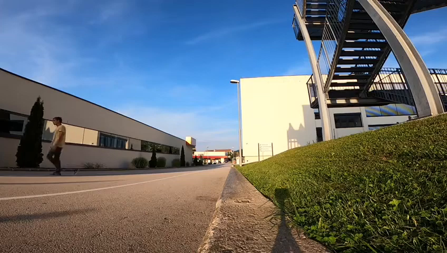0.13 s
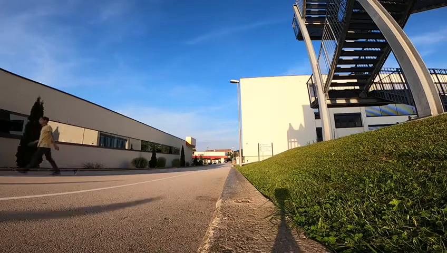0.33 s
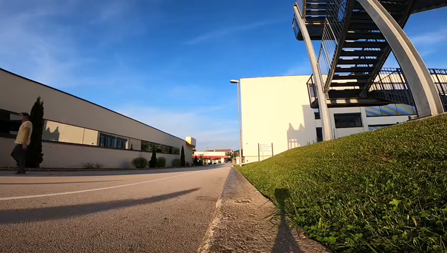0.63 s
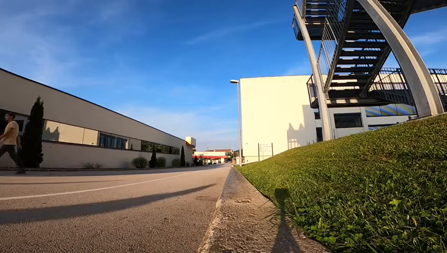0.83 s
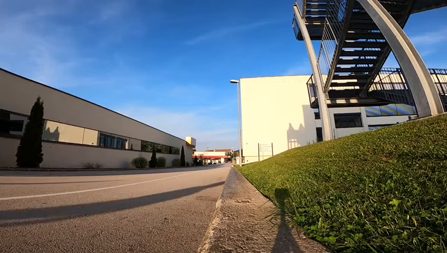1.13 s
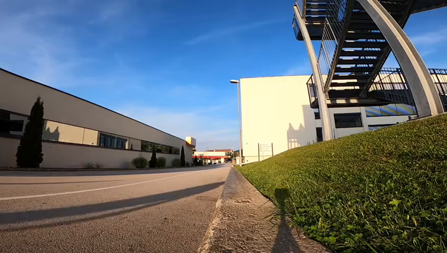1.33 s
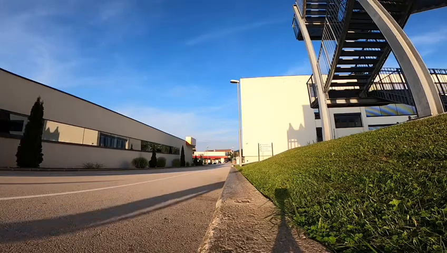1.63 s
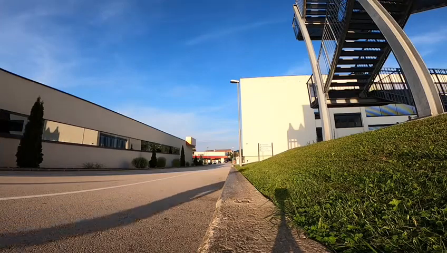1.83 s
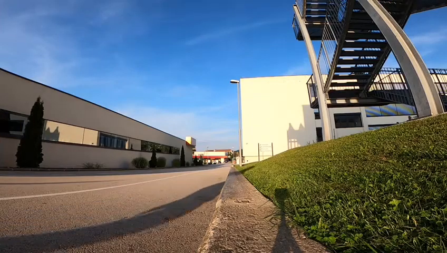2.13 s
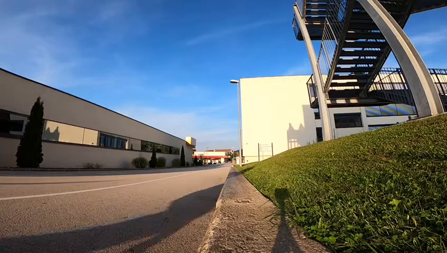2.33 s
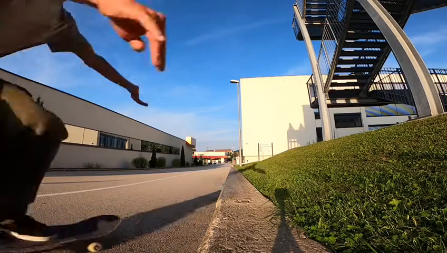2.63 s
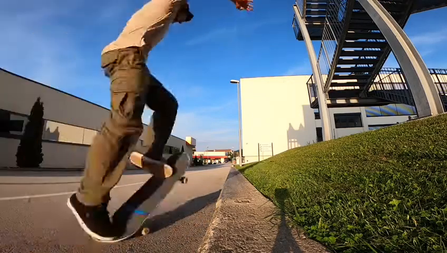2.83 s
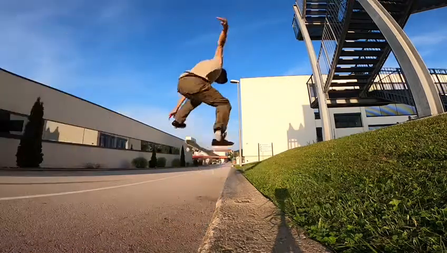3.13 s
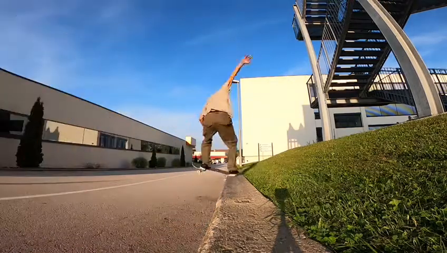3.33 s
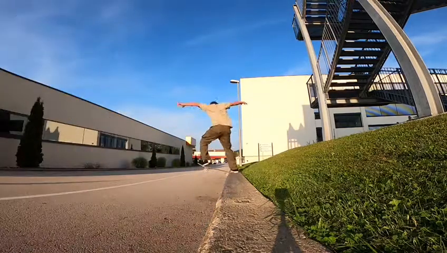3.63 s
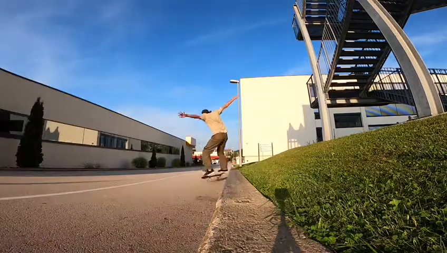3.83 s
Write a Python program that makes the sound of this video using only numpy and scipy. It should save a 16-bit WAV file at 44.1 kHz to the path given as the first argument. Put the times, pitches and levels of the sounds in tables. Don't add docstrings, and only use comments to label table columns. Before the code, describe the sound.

Outdoors by a building, skateboard wheels rumble and tick over grit, swelling past a low stereo microphone; a sharp pop, brief airborne whirr, bright landing clacks and a short fading grind follow over ventilation hum.

```python
import sys
import numpy as np
from scipy import signal
from scipy.fft import rfft, irfft
from scipy.io import wavfile
from scipy.ndimage import uniform_filter1d

SR = 44100
rng = np.random.default_rng(int(sys.argv[2]) if len(sys.argv) > 2 else 0)


def wrap_up_sound(samples):
    columns = np.atleast_2d(samples).T
    tamed = np.clip(columns, -1, 1)
    steps = np.round(tamed * 32767).astype(np.int16)
    wavfile.write(sys.argv[1], SR, steps)


def level_to_linear(level):
    exponent = np.asarray(level, float) / 20
    return 10 ** exponent


N = 176400
T = np.arange(N) / SR

# frequency in Hz, level in dB per Hz.
TOWN_SPECTRUM = [(20, 2), (53, 5.5), (150, -12), (860, -18.5), (2400, -27.5), (6500, -32.5), (11500, -78)]
TOWN_DB = -51.5

# time in seconds, level in dB.
HUM_LEVEL = [(.15, -32.5), (.3, -26), (.76, -31), (.87, -41.5), (1.0, -33), (1.4, -39), (2.1, -29),
             (2.3, -32.5), (2.42, -28), (2.85, -30.5), (3.09, -52), (3.25, -37.5), (3.62, -46.5),
             (3.85, -41.5)]
# time in seconds, level in dB.
UNDER_LEVEL = [(.15, -45), (.4, -40), (1., -42), (1.3, -39), (1.8, -35), (2.1, -45), (2.7, -49), (3.3, -45),
               (3.6, -51), (4., -49)]
HUM_HZ, HUM_SAG_HZ_PER_S, UNDER_WIDTH_HZ = 117.55, 0.923, 2.5

# time in seconds, level in dB, closeness from 0 to 1.
ROLL = [(.14, -41.5, 0.13), (.22, -34.5, 0.75), (.38, -39, 0.22), (.61, -34.5, 0.47), (.85, -37.5, 0),
        (1.2, -31.5, 0.06), (1.65, -31.5, 0.11), (2.12, -29.5, 0.06), (2.23, -24.5, 0.28),
        (2.34, -30.5, 0.48), (2.47, -25.5, 0.28), (2.62, -25, 0.82), (2.78, -20.5, 0.85), (2.91, -22, 0.95),
        (2.955, -27.5, 0.6), (3.0, -19, 1), (3.03, -35, 1)]
# time in seconds, extra level in dB.
JOINTS = [
    (.7, -1),
    (1.127, 2),
    (1.21, 4),
    (1.348, 3),
    (1.428, 3.5),
    (1.48, 3.5),
    (2.669, -0.5),
    (2.747, -2),
]
# frequency in Hz, level in dB per Hz.
FAR = [(90, -20.5), (150, 1.5), (1050, -12), (1250, -24), (5000, -36), (6800, -47.5), (9500, -47.5),
       (11600, -59)]
NEAR = [(70, -8.5), (140, -3), (300, 0.5), (480, -2), (900, -11), (2400, -20), (6500, -33.5),
        (11500, -46.5)]
# frequency in Hz, width in Hz, level in dB.
DECK = [(327, 89, 4), (482, 15, -2), (661, 54, 8), (990, 140, -10.5), (3370, 260, -12)]
STONES_PER_S, STONE_SPREAD_DB, JUDDER_DB, PATCH_S = 3500, 2, 0.52, .012
PASSES_S, SWING_S = 2.756, 0.083

# start in seconds, level in dB, pitch in Hz, t60 in seconds.
PEBBLES = [(.499, -19, 326, 0.038), (.584, -22, 346, .05), (.693, -25, 665, .04), (1.011, -20, 202, 0.037),
           (1.123, -15.5, 674, 0.066), (1.196, -21, 315, .045), (1.277, -18.5, 676, 0.045),
           (1.323, -20, 490, .043), (1.404, -24, 226, .04), (1.479, -12.5, 300, .02),
           (1.553, -17, 660, 0.04), (1.662, -28, 640, .05), (2.014, -22, 640, .04), (2.399, -14, 140, .06),
           (2.427, -10, 152, .06), (2.456, -19, 153, .05), (2.483, -11, 170, .05), (2.513, -13, 189.9, .04),
           (2.549, -14, 229, 0.059), (2.592, -5.5, 221, 0.046), (2.641, -10, 480, 0.054),
           (2.671, -6, 203, 0.051), (2.743, -9.5, 332, 0.028), (2.766, -10, 340, .04),
           (2.782, -11, 477, .03), (2.844, -16, 452, 0.052), (2.878, -13, 469, .04)]
# time in seconds, pitch in Hz, level in dB.
BOOM = [
    (2.199, 121.9, -58),
    (2.381, 141.7, -24),
    (2.52, 160.4, -26),
    (2.68, 200.5, -22),
    (2.85, 209.2, -30),
    (2.93, 264, -32),
    (2.999, 270.5, -48),
]

# centre in seconds, length in seconds, level in dB, lowest frequency in Hz.
SCUFFS = [
    (2.205, 0.022, -34, 900),
    (2.919, 0.094, -27.5, 708),
    (3.068, 0.059, -41.5, 2300),
    (3.092, 0.038, -39.5, 3820),
    (3.564, 0.032, -29, 800),
]
# frequency in Hz, level in dB per Hz.
SCUFF_SPECTRUM = [(500, -35), (1000, 20.5), (2600, 11.5), (7300, -2.5), (11500, -12.5)]

# start in seconds, level in dB, chatter length in seconds,
# brightness in dB per octave.
BLOWS = [(2.972, -27.5, 0.014, 3), (2.985, -22, 0.0049, -1), (3.0015, -10.5, 0.0068, -2.5),
         (3.014, -23.5, 0.004, -3), (3.3339, -15.5, 0.0032, -6.5), (3.3368, -14, 0.005, -4.5),
         (3.3942, -5.5, 0.0047, 1.5), (3.4148, -19, 0.002, -3), (3.4257, -12, 0.0073, 0.5),
         (3.441, -39, 0.0052, 9), (3.456, -25, .005, -4), (3.4615, -18, 0.0018, 6),
         (3.4727, -17, 0.00099, 4), (3.486, -34, 0.0056, -12), (3.511, -39, 0.0051, -4),
         (3.5545, -33, 0.0094, 2), (3.628, -38, 0.0091, -4), (3.663, -33.5, 0.015, 1),
         (3.762, -37.5, 0.02, 3)]
# frequency in Hz, level in dB per Hz.
CLACK_SPECTRUM = [(400, -24), (1200, -10), (2000, 0), (4400, -2), (5400, -13), (6800, -20), (7600, -42),
                  (11500, -56)]
# frequency in Hz, level in dB, t60 in seconds.
AXLE = [(1380, -3, .03), (1860, 0, .028), (2300, -2, .022), (2950, -3, .012), (3500, -2, .012),
        (4200, -2, .01)]
# start in seconds, level in dB, pitch in Hz, t60 in seconds.
KNOCKS = [(2.9725, -17, 840, 0.032), (2.979, -15, 423, .03), (2.9905, -15, 710, 0.011),
          (2.9945, -5, 360, 0.011), (3.0115, -10, 315, 0.024), (3.0265, -13, 198, .02),
          (3.3338, -17, 760, 0.0069), (3.3425, -16, 194, 0.041), (3.3985, -8.5, 266, 0.059),
          (3.4153, -5, 366, 0.012), (3.419, -15.5, 149, 0.094), (3.4335, -11, 240, 0.046),
          (3.447, -23, 536, 0.089), (3.461, -18.5, 209, 0.098), (3.474, -18, 1360, 0.029),
          (3.487, -20.5, 229, 0.078), (3.5, -23, 288, 0.1), (3.77, -30.5, 700, .05),
          (3.5555, -24.5, 1017, 0.1), (3.565, -26, 104, 0.27), (3.57, -27.5, 483, 0.12)]
WALL_S, WALL_DB, YARD_T60_S, YARD_DB = 0.029, -37, 0.68, -21.5

# time in seconds, level in dB.
SLIDE = [(3.015, -47), (3.05, -47), (3.13, -48.5), (3.22, -46.5), (3.31, -51.5), (3.36, -39), (3.45, -33.5),
         (3.5, -38), (3.54, -41), (3.631, -40), (3.7, -45.5), (3.76, -45), (3.85, -47.5), (4., -52)]
# frequency in Hz, level in dB per Hz.
GRIND = [(90, -26), (200, -2), (1100, -6), (3600, -12.5), (6700, -24.5), (7400, -36), (11500, -41)]

# time in seconds, level in dB.
SPIN = [
    (3.03, -56),
    (3.12, -51),
    (3.2, -42),
    (3.29, -47.5),
    (3.33, -37.5),
    (3.4, -53),
    (3.6, -60),
]
# frequency in Hz, width in Hz, level in dB.
BEARINGS = [(1010, 190, -1.5), (1700, 440, 0), (2450, 400, -5), (3440, 250, -6), (4970, 1100, -13),
            (6500, 350, -22)]

# frequency in Hz, difference in dB.
PORT_DB = [(100, 0.41), (350, 3.8), (620, 15), (1120, 27), (3600, 13.2), (6500, 3), (11600, 10.7)]
# frequency in Hz, phase in radians.
PORT_RAD = [(1000, 0.09), (3000, -4.5), (3600, -14), (6800, 4), (11500, 4)]
START_S, FADE_S, TOP_HZ = .12, 0.041, 11500

OPPOSITE = np.array([[1], [-1]])


def unit(x):
    return x / np.sqrt(np.mean(x ** 2))


def butter(x, order, hz, kind="low"):
    return signal.sosfilt(signal.butter(order, hz, kind, fs=SR, output="sos"), x)


def read(table, hz):
    a = np.array(table, float)
    return np.interp(np.log(np.maximum(hz, 1)), np.log(np.maximum(a[:, 0], 1)), a[:, 1])


def colour(x, table, tilt_db=0.):
    hz = np.arange(2049) * SR / 4096
    db = read(table, hz) + tilt_db * np.log2(np.maximum(hz, 50) / 2500)
    cepstrum = irfft(db * np.log(10) / 20)
    cepstrum[1:2048] *= 2
    cepstrum[2049:] = 0
    impulse = irfft(np.exp(rfft(cepstrum)))[:2048]
    return signal.fftconvolve(x, impulse)[:len(x)]


def ring(x, modes):
    out = 0
    for hz, db, t60 in modes:
        pole = np.exp(2j * np.pi * hz / SR - np.log(1000) / (t60 * SR))
        out = out + level_to_linear(db) * signal.lfilter([1], [1, -pole], x).imag
    return out


def t60_of(width_hz):
    return np.log(1000) / (np.pi * width_hz)


def resonances(table):
    return [(hz, db + 10 * np.log10(width), t60_of(width)) for hz, width, db in table]


def walk(rate):
    k = int(SR / rate)
    steps = np.repeat(rng.standard_normal(N // k + 1), k)
    return unit(uniform_filter1d(uniform_filter1d(steps, k), k)[:N])


def stones(per_s, spread_db):
    hit = rng.random(N) < per_s / SR
    size = np.minimum(rng.exponential(size=N), 4.5)
    return unit(hit * np.sign(rng.standard_normal(N)) * level_to_linear(spread_db * size))


def ports(x, left):
    hz = np.arange(N // 2 + 1) * SR / N
    right = level_to_linear(-read(PORT_DB, hz)) * np.exp(-1j * read(PORT_RAD, hz))
    side = np.clip(left, 0, 1.2) * irfft(rfft(x) * (1 - right) / (0.97 + right), N)
    return np.array([x + side, x - side])


def town():
    mid, side = (unit(colour(rng.standard_normal(N), TOWN_SPECTRUM)) for _ in range(2))
    side = butter(side, 1, 1500., "high")
    rumble = unit(butter(rng.standard_normal(N), 2, [30., 80.], "band"))
    mid = mid + level_to_linear(-6.0 + 2 * walk(5.6)) * rumble
    side = side + 0.63 * butter(unit(colour(rng.standard_normal(N), TOWN_SPECTRUM)), 2, 45.)
    return (mid + 0.87 * side * OPPOSITE) * level_to_linear(TOWN_DB + 2.2 * (3.5 - T) + 5.2 * walk(3.06))


def hum():
    s, db = np.array(HUM_LEVEL).T
    phase = 2 * np.pi * np.cumsum(HUM_HZ - HUM_SAG_HZ_PER_S * T + 1.203 * walk(8)) / SR
    under = unit(ring(rng.standard_normal(N), [(60.8, 0, t60_of(UNDER_WIDTH_HZ))]))
    rough = unit(butter(rng.standard_normal(N), 2, [106., 128.], "band"))
    tone = (1.43 * np.sin(phase) + 0.43 * rough) * level_to_linear(np.interp(T, s, db) + 2 * walk(20))
    return tone + level_to_linear(np.interp(T, *np.array(UNDER_LEVEL).T) - 2.5) * under


def roll():
    s, db, close = np.array(ROLL).T
    db = np.interp(T, s, db)
    close = np.clip(np.interp(T, s, close), 0, 1)
    patches = sum(extra_db * np.exp(-((T - at) / PATCH_S) ** 2) for at, extra_db in JOINTS)
    slow = JUDDER_DB * walk(8.18) + patches
    knock, other, fine = (stones(STONES_PER_S, STONE_SPREAD_DB) * level_to_linear(slow + 1.86 * walk(45.49))
                          for _ in range(3))
    grit = 1.08 * fine + 0.43 * level_to_linear(slow) * rng.standard_normal(N)
    knock = butter(knock, 2, 2500.) + butter(grit, 2, 2500., "high")
    far, near = unit(colour(knock, FAR)), unit(colour(knock, NEAR))
    deck = unit(ring(other, resonances(DECK)))
    body = (1 - close) * (far + level_to_linear(-2.0) * deck) + close * level_to_linear(0.5) * near
    gain = level_to_linear(db + 2.0) * np.clip((s[-1] - T) / 0.0053, 0, 1)
    left = 0.077 + 0.68 / (1 + np.exp((T - PASSES_S) / SWING_S))
    spread = butter(unit(colour(other, FAR)), 2, 500., "high")
    spread = spread + level_to_linear(-6.) * butter(unit(colour(other, NEAR)), 4, 6500., "high")
    return ports(body * gain, left) + level_to_linear(-14.0) * gain * spread * OPPOSITE


def knocks(table):
    n = 8192
    out, t = np.zeros(N + n), T[:n]
    for s, db, hz, t60 in table:
        fade = np.log(1000) * t / t60
        wave = np.sin(2 * np.pi * hz * t) * np.exp(-fade)
        wave = wave + 0.17 * np.sin(2 * np.pi * 1.65 * hz * t) * np.exp(-1.5 * fade)
        out[int(s * SR):][:n] -= level_to_linear(db) * wave * np.minimum(t / 0.00027, 1) / np.abs(wave).max()
    return out[:N]


def ticks():
    x = np.zeros(N)
    for s, db, *_ in PEBBLES:
        x[int(s * SR):][:60] += level_to_linear(db) * rng.standard_normal(60) * np.exp(-T[:60] / .0005)
    return level_to_linear(-7) * colour(x, GRIND)


def boom():
    s, hz, db = np.array(BOOM).T
    turn = 2j * np.pi * np.cumsum(np.interp(T, s, hz)) / SR

    def shake(width_hz):
        return butter(stones(2500., 1.1) + 1j * stones(2500., 1.1), 2, width_hz)

    low = unit((shake(30.5) * np.exp(turn)).real)
    high = unit((shake(48.0) * np.exp(2.3 * turn)).real)
    level = level_to_linear(np.interp(T, s, db, left=-120, right=-120))
    return ports((low + level_to_linear(-10.0) * high) * level, 0.8)


def scuffs():
    rub = colour(stones(6500.0, 2.2), SCUFF_SPECTRUM)
    out = np.zeros(N)
    for s, long_s, db, lowest_hz in SCUFFS:
        flick = unit(butter(rub, 4, lowest_hz, "high"))
        out += flick * level_to_linear(db) * np.exp(-((T - s) / (long_s / 2.8)) ** 2)
    return ports(out, 0.14)


def blows():
    n = 4096
    out, t = np.zeros(N + n), T[:n]
    chance = rng.standard_normal((len(BLOWS), 2, n))
    for (s, db, long_s, tilt_db), (a, b) in zip(BLOWS, chance):
        swell = np.minimum(t / (.12 * long_s), 1) * np.exp(-(t / long_s) ** 3)
        clack = colour(a * np.sqrt(np.abs(b)) * swell, CLACK_SPECTRUM, tilt_db)
        modes = [(hz * (1 + 0.035 * b[k]), g + 2 * a[k], t60) for k, (hz, g, t60) in enumerate(AXLE)]
        axle = ring(clack, modes)
        crack = clack / np.abs(clack).max() + level_to_linear(-6.5) * axle / np.abs(axle).max()
        out[int(s * SR):][:n] += level_to_linear(db + 3.5) * crack
    return out[:N]


def yard(x):
    t = T[:SR // 2]
    tail = rng.standard_normal((2, len(t))) * level_to_linear(-60 * t / YARD_T60_S) * np.minimum(t / 0.016, 1)
    tail = signal.lfilter([1], [1, -.6], tail)
    size = np.sqrt(np.sum(tail[0] ** 2))
    tail = level_to_linear(YARD_DB) * (tail[0] + 0.048 * tail[1] * OPPOSITE) / size
    tail[:, int(WALL_S * SR)] += level_to_linear(WALL_DB)
    return signal.fftconvolve(x[None], tail, axes=1)[:, :N]


def slide():
    s, db = np.array(SLIDE).T
    grit = stones(6000., 1.8) * level_to_linear(2.2 * walk(30))
    return ports(unit(colour(grit, GRIND)) * level_to_linear(np.interp(T, s, db, left=-120) + 4.5), 0.21)


def spin():
    s, db = np.array(SPIN).T
    whirr = ring(rng.standard_normal(N), resonances(BEARINGS))
    whirr = unit(butter(whirr, 2, [600., 9000.], "band"))
    return ports(whirr * level_to_linear(np.interp(T, s, db, left=-120, right=-120) + 2.5 * walk(40)), 0.39)


def scene():
    rolling = roll() + boom() + ports(level_to_linear(-3) * knocks(PEBBLES) + ticks(), 0.85)
    hits = blows() + knocks(KNOCKS)
    landing = ports(hits, 0.085) + yard(hits)
    return town() + hum() + rolling + scuffs() + landing + slide() + spin()


def band_limit(x):
    return signal.sosfilt(signal.butter(12, 12250, fs=SR, output="sos"), x)


def record(dry):
    x = np.tanh(1.008 * dry) / 1.003 * np.clip((T - START_S) / FADE_S, 0, 1)
    x = signal.sosfilt(signal.ellip(8, .2, 70, TOP_HZ, fs=SR, output="sos"), x)
    x = butter(x, 2, 35., "high")
    return band_limit(x)


dry = scene()
out = record(dry)
wrap_up_sound(out)
```